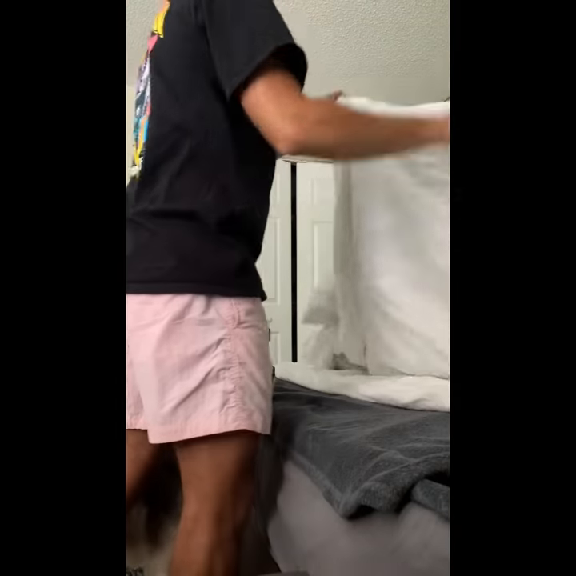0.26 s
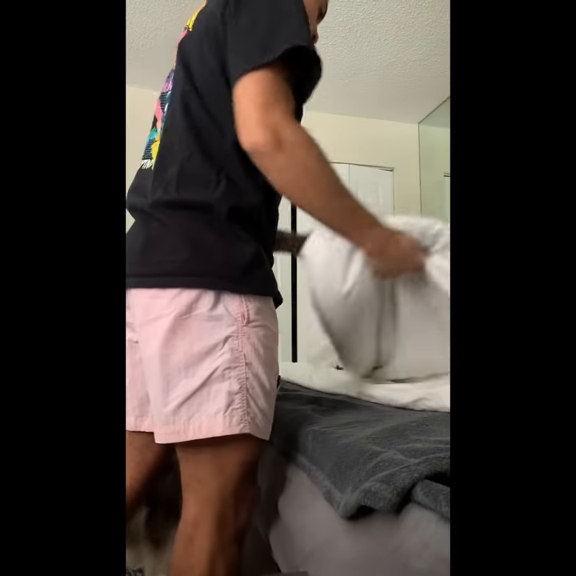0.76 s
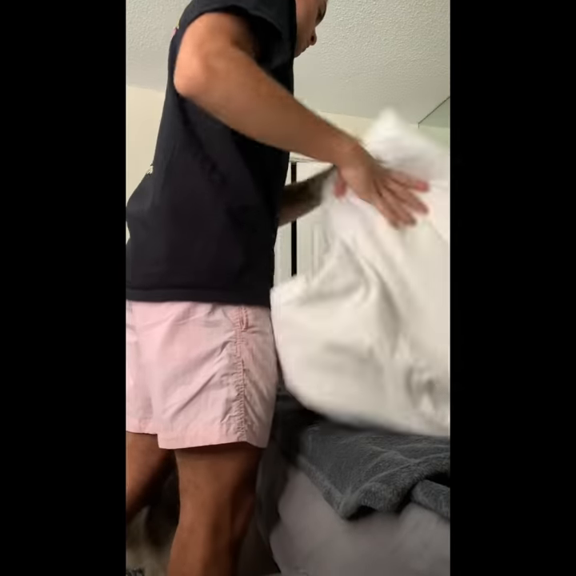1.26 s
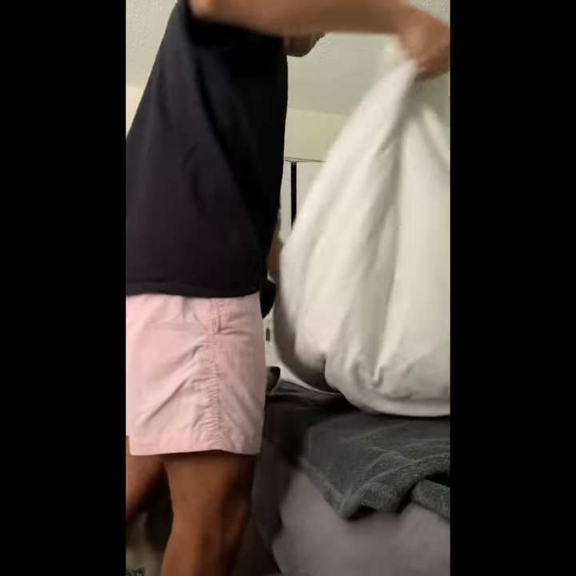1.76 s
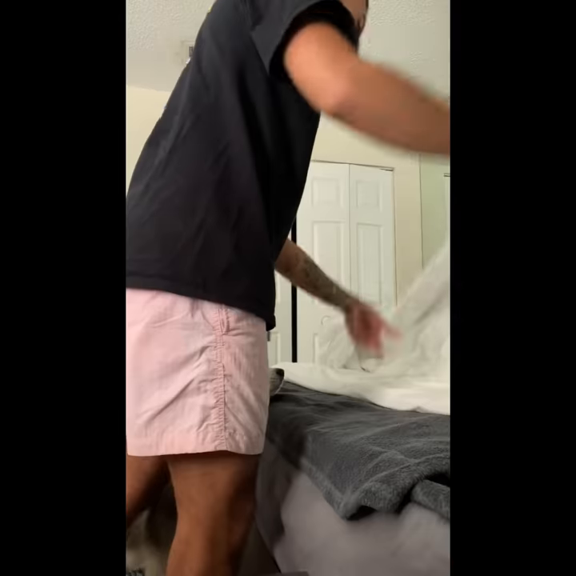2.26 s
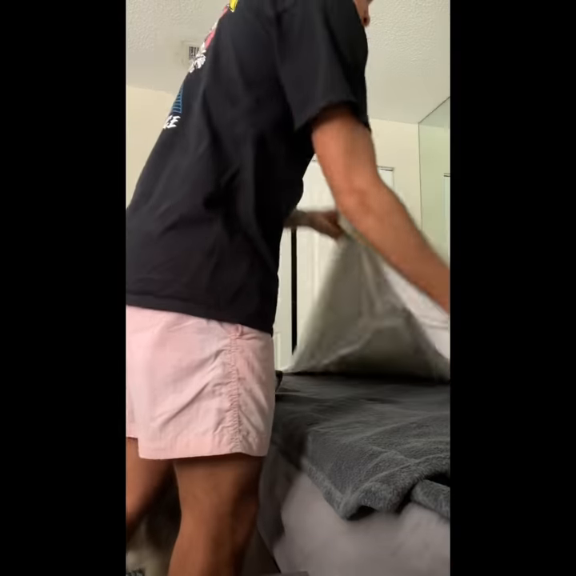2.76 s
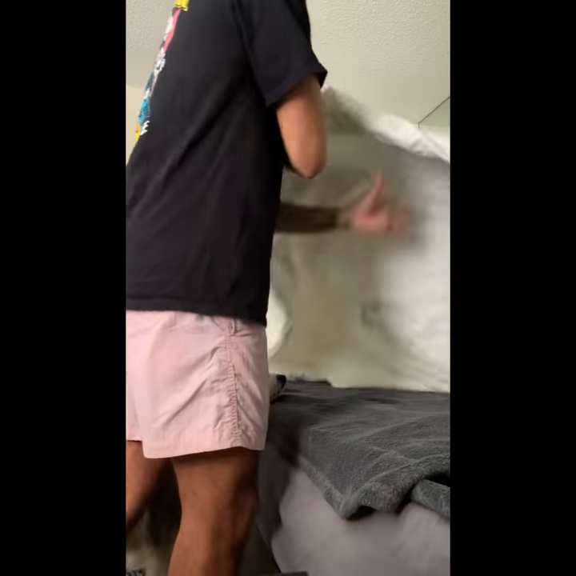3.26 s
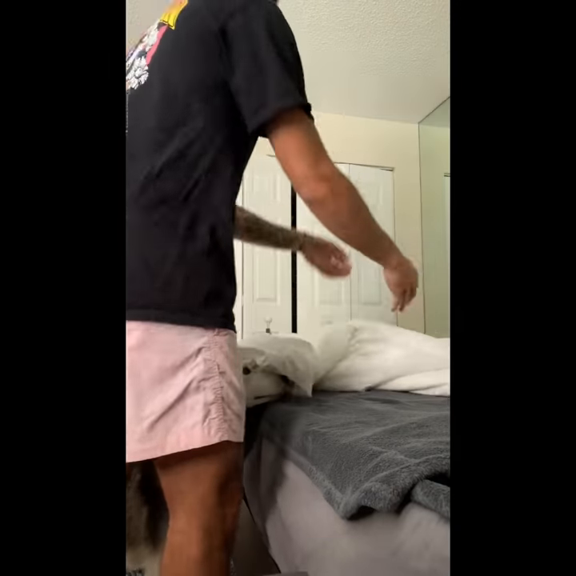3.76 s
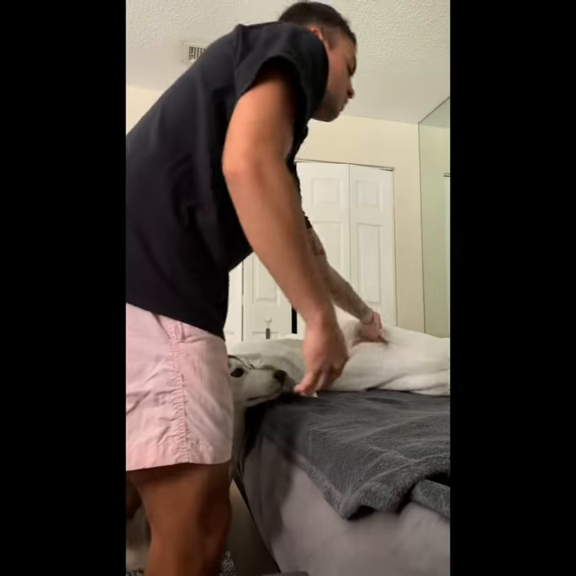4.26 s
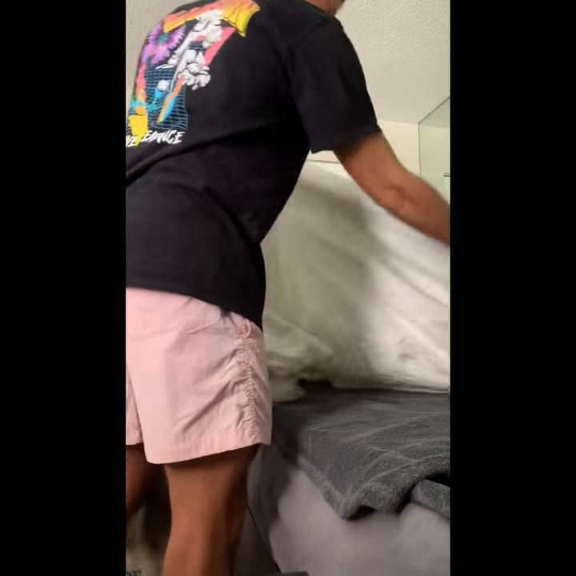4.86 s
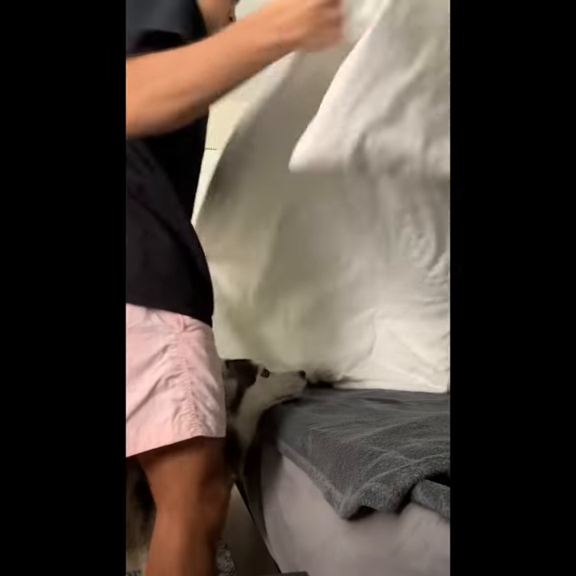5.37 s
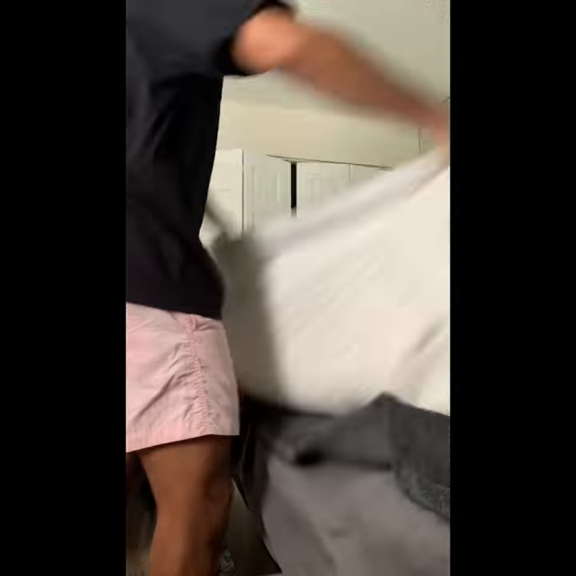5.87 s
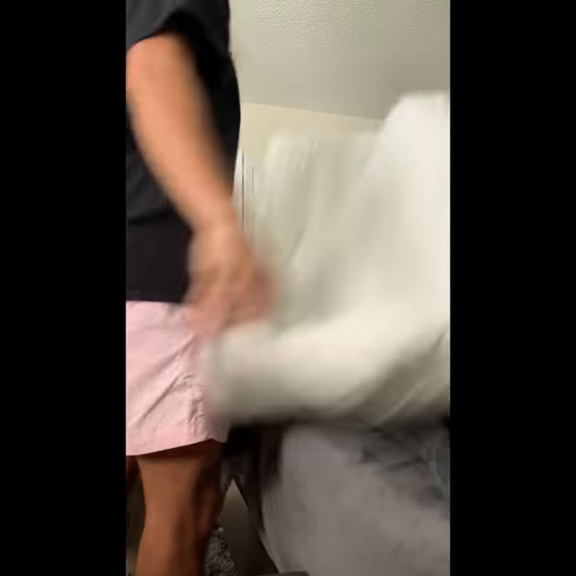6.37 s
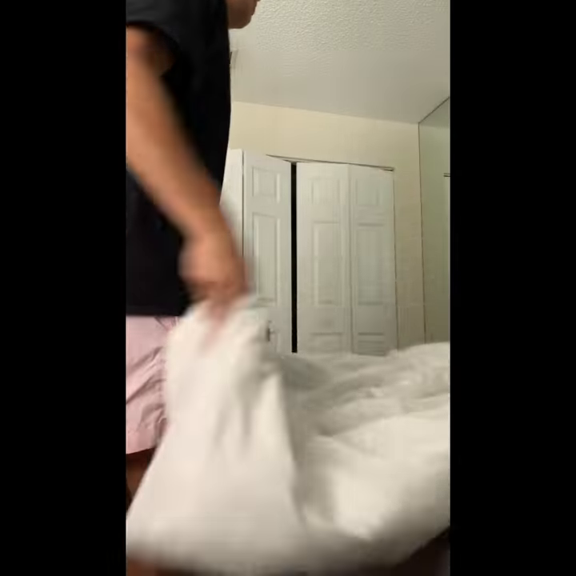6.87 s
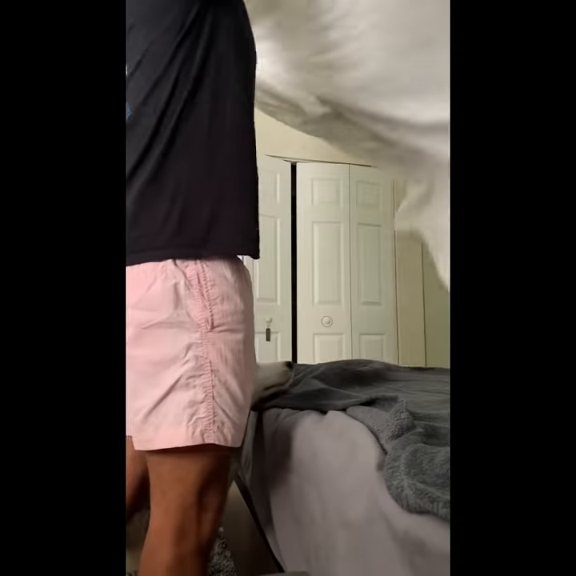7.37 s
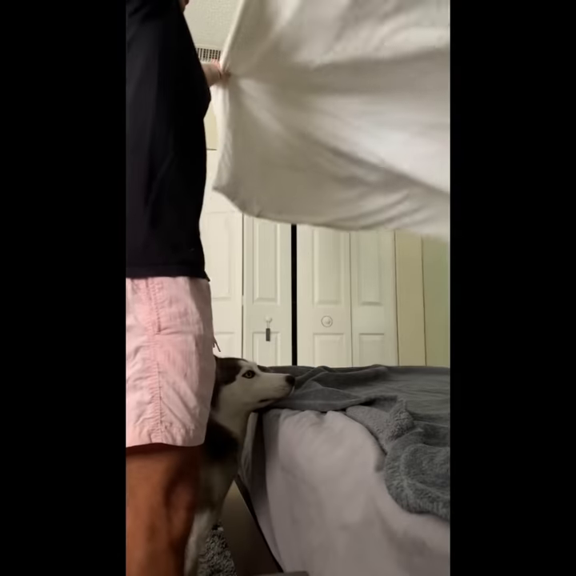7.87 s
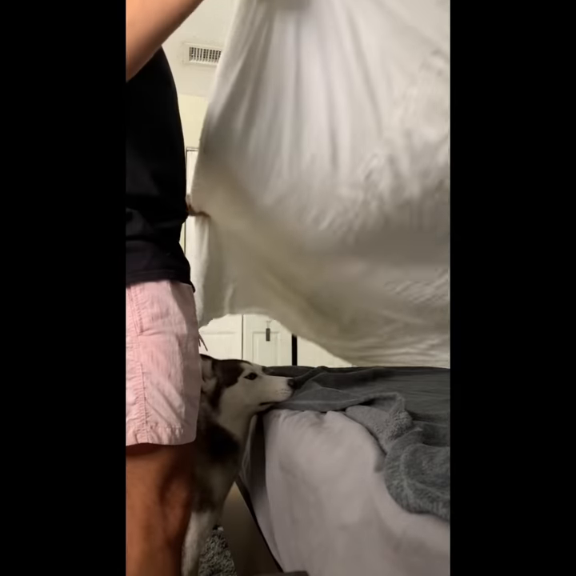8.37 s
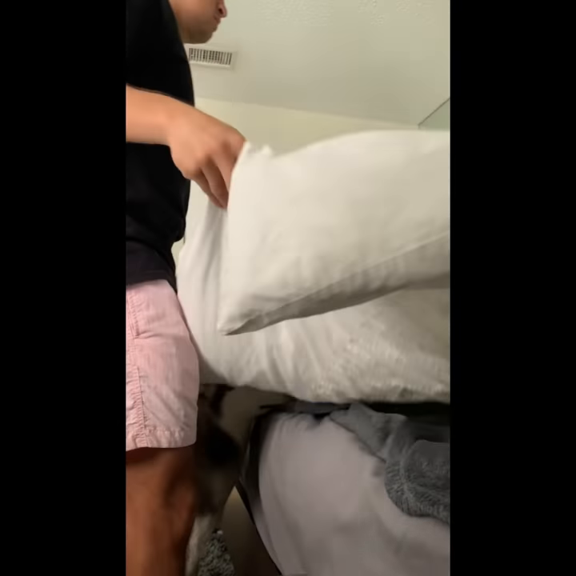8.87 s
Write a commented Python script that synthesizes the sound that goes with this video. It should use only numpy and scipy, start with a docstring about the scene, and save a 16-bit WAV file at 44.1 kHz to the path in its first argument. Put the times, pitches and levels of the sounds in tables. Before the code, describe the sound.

Soft cloth rustling and light pats build to a burst of heavy, padded flapping and airy thumps, then settle into dull puffs of air.

```python
"""A small bedroom: pillows are lifted, shaken out and dropped on a bed, an arm's length from a phone.
Slack cotton folds, rubs and hisses: noise and random slips, coloured and swelled with each move.
Taut panels flap as short noise bursts; the soft filling puffs air as brief low pressure swings.
Under it a household motor hums and an engine drones faintly outside, both as sine tones."""
import sys
import numpy as np
from scipy import signal
from scipy.fft import rfft, irfft, next_fast_len
from scipy.io import wavfile

SR = 44100
rng = np.random.default_rng(int(sys.argv[2]) if len(sys.argv) > 2 else 0)


def unload_audio(sound):
    """Save the sound as a 16-bit wav file, at the path given as the first command line argument."""
    columns = np.transpose(np.atleast_2d(sound))
    # keep every value between -1 and 1, then stretch to whole-number steps
    steps = np.round(np.clip(columns, -1, 1) * 32767)
    wavfile.write(sys.argv[1], SR, steps.astype(np.int16))


N = 402191
TIME = np.arange(N) / SR  # s


def undb(db):
    """Decibels to gain."""
    return 10 ** (np.asarray(db) / 20)


def unit(x):
    """Scale to rms 1."""
    return x / np.sqrt(np.mean(x ** 2))


def curves(rows):
    """Each column of a table, joined by straight lines in time."""
    s, *columns = np.transpose(rows)
    return [np.interp(TIME, s, column) for column in columns]


def colour(x, points):
    """Filter by a spectrum of (f/Hz, gain/dB) points, joined on a log frequency axis."""
    hz, db = np.transpose(points)
    size = next_fast_len(len(x))
    f_hz = np.maximum(np.fft.rfftfreq(size, 1 / SR), 1)
    gain = undb(np.interp(np.log(f_hz), np.log(hz), db))
    return irfft(rfft(x, size) * gain, size)[:len(x)]


def band(x, lo_hz, hi_hz):
    """Causal band-pass, 18 dB an octave on both sides."""
    sos = signal.butter(3, [lo_hz, hi_hz], "band", fs=SR, output="sos")
    return signal.sosfilt(sos, x)


def walk(rate_hz):
    """Slow chance with a spread near 1: random points joined by straight lines."""
    points = np.clip(rng.standard_normal(4096), -1.8, 1.8)
    return np.interp(TIME * rate_hz, np.arange(len(points)), points)


def add(track, s, sound):
    """Mix a sound in at a time."""
    i = max(int(s * SR), 0)
    track[i:i + len(sound)] += sound[:max(N - i, 0)]


MOVE_SHAPE = 1.42  # 1: pointed crest, 2: round crest


def swells(moves):
    """Each move gathers strength up to its crest and dies away; overlapping moves add in power."""
    t = TIME[::64]
    power = 1e-11  # floor
    for s, rise_s, fall_s, db in moves:
        before = (s - t) / max(rise_s, .01)
        after = (t - s) / max(fall_s, .01)
        away = np.where(t < s, before, after)
        power = power + (undb(db) * np.exp(-away ** MOVE_SHAPE)) ** 2
    return np.interp(TIME, t, np.sqrt(power))


# port unlikeness: f/Hz, side minus mid level/dB
PORT_WIDTH = [(150, -18), (350, -1), (1300, 3.5), (6000, -6)]


def two_ports(size):
    """Diffuse sound at two close ports: alike in the bass, less alike higher up."""
    mid, side = rng.standard_normal((2, size))
    side = colour(side, PORT_WIDTH)
    return np.array([mid + side, mid - side])


def bedroom(x, wet_db, t60_s):
    """The direct sound reaches both ports; near walls add a short, dense tail."""
    t = TIME[:SR // 2]
    onset = np.clip((t - .002) / 0.0031, 0, 1)
    tail = two_ports(len(t)) * undb(-60 * t / t60_s) * onset
    tail *= undb(wet_db) / np.sqrt(np.sum(tail.mean(axis=0) ** 2))
    wet = signal.fftconvolve(x[None], tail, axes=1)[:, :N]
    return (x + wet) / np.sqrt(1 + undb(2 * wet_db))  # keeps the power about even


# still-air spectrum: f/Hz, relative level/dB
STILL_SPECTRUM = [(20, -20), (45, -2), (100, -1.5), (200, -11), (450, -23), (900, -28), (1700, -31),
                  (3300, -32.5), (6500, -37), (16000, -39)]
STILL_RMS_DB = -57.7  # mean of a slow wander


def still_air():
    """Diffuse room noise, duller with frequency, its level wandering slowly."""
    noise = unit(np.array([colour(port, STILL_SPECTRUM) for port in two_ports(N)]))
    return noise * undb(STILL_RMS_DB + 0.5 * walk(rate_hz=2.0))


# engine pulling away and changing up: t/s, firing rate f/Hz, rms level/dB
ENGINE_TRACK = [(2.3, 42, -74), (3.5, 42, -61), (4.2, 38, -59), (4.6, 44, -50), (5, 49, -46),
                (5.7, 55, -41.5), (6.4, 65, -40.5), (7.3, 56, -48.5), (8.3, 57.5, -42.5), (9.12, 58, -85)]


def engine():
    """A sine at the firing rate, gliding with engine speed."""
    hz, db = curves(ENGINE_TRACK)
    phase = 2 * np.pi * np.cumsum(hz) / SR
    return np.sqrt(2) * undb(db) * np.sin(phase)


# motor hum: t/s, rms level/dB (mean of a slow wander)
HUM_TRACK = [(0, -49.5), (.4, -55), (1.5, -53.5), (2.6, -49.5), (4, -45.5), (5.5, -43), (7, -89),
             (7.7, -92), (9.12, -42.5)]
MOTOR_HZ, MAINS_BUZZ_HZ = 59.4, 120


def motor():
    """The motor's hum and its mains buzz: two sines of wandering level."""
    hum_db, = curves(HUM_TRACK)
    hum = undb(hum_db + 1.15 * walk(rate_hz=3.67)) * np.sin(2 * np.pi * MOTOR_HZ * TIME)
    buzz = undb(-60.0 + 0.75 * walk(rate_hz=3.1)) * np.sin(2 * np.pi * MAINS_BUZZ_HZ * TIME)
    return np.sqrt(2) * (hum + buzz)


def background():
    """Still room air, the motor and the engine."""
    return still_air() + motor() + engine()


# stirred-air spectrum: f/Hz, relative level/dB
AIR_SPECTRUM = [(20, -33), (35, -6), (50, 2.5), (70, -0.5), (92, 0.5), (125, -2.5), (170, -9.5),
                (300, -24.5), (800, -67)]


def stirred_air(air):
    """Eddies shed by the swinging pillow: low noise that follows the air's strength."""
    return air * unit(colour(rng.standard_normal(N), AIR_SPECTRUM))


# a loose sheet fills with air: crest t/s, rise/s, fall/s, level/dB
SHEET_BILLOWS = [(1.3, 0.091, 0.05, -50), (1.77, 0.041, 0.022, -49), (2.45, 0.075, 0.07, -43),
                 (3.2, 0.27, 0.34, -46.5), (4.63, 0.02, 0.039, -38), (5.25, 1, 0.2, -54),
                 (7.26, 0.068, 0.021, -40), (7.54, 0.038, 0.023, -39.5), (8.0, 0.022, 0.017, -43),
                 (8.2, 0.096, 0.04, -45), (8.72, 0.28, 0.036, -51)]
# billow spectrum: f/Hz, relative level/dB
BILLOW_SPECTRUM = [(50, 4), (110, 1), (170, -3.5), (270, -2), (400, -10.5), (700, -33.5), (1500, -68)]


def billows():
    """Broad, slack cloth pushes the air without creasing: smooth, dull swells of noise."""
    return swells(SHEET_BILLOWS) * unit(colour(rng.standard_normal(N), BILLOW_SPECTRUM))


# puffs of air from the filling: crest t/s, dry peak level/dB, f/Hz
FILLING_PUFFS = [(0.551, -27.5, 103), (1.223, -26.5, 110), (3.013, -24.5, 84.5), (6.032, -12, 107),
                 (6.411, -18.5, 97), (6.578, -6, 94.5), (7.041, -17, 88), (7.084, -22, 66),
                 (8.532, -25, 60), (8.616, -23.5, 60.3), (8.73, -14, 45.4), (8.758, -14.5, 73.4),
                 (9.051, -25, 60.6)]


def thumps():
    """The filling is squeezed and springs back: one smooth swing of pressure."""
    out, half = np.zeros(N), SR // 10
    t = np.arange(-half, half) / SR
    for s, db, hz in FILLING_PUFFS:
        swing = np.cos(2 * np.pi * hz * t) * np.exp(-(t * hz / 0.61) ** 2)
        add(out, s - half / SR, undb(db) * swing)
    return out


# cloth pulled taut or patted: t/s, dry peak level/dB, body f/Hz, brightness f/Hz, decay/s
TAUT_FLAPS = [(.497, -41.5, 278, 1860, 0.02), (1.214, -23, 396, 2460, 0.006), (1.218, -27, 150, 453, 0.013),
              (2.841, -31.5, 250, 950, 0.0061), (2.964, -42, 300, 1580, 0.005),
              (2.993, -40, 376, 2190, 0.0092), (3.262, -40, 230, 900, 0.028),
              (3.448, -39.5, 230, 870, 0.02), (3.681, -42.5, 250, 1180, 0.0034),
              (4.626, -38, 170, 1000, 0.0095), (4.81, -40.5, 190, 560, .012),
              (4.885, -38, 140, 910, 0.0098), (5.766, -32, 275, 930, 0.01), (5.812, -19, 403, 870, 0.0055),
              (6.178, -17.5, 218, 470, 0.02), (6.197, -12, 226, 546, 0.014),
              (6.201, -18.5, 590, 2230, 0.01), (6.338, -27.5, 890, 2100, 0.022),
              (6.405, -23.5, 160, 614, 0.018), (6.563, -18, 200, 970, 0.0098),
              (6.932, -30, 250, 1220, 0.078), (7.006, -23.5, 298, 1520, 0.005),
              (7.352, -24, 133, 267, 0.0065), (8.829, -42, 130, 440, 0.0041), (8.852, -37, 140, 450, 0.004)]
RISE_PER_DECAY, TUG = .12, 11  # TUG: first sample, in noise rms


def flaps():
    """A panel snaps taut: a sharp tug, then a noise burst; deeper if large, duller where padded."""
    out, t = np.zeros(N), TIME[:SR // 4]
    for s, db, body_hz, bright_hz, decay_s in TAUT_FLAPS:
        age = t / decay_s
        envelope = (1 - np.exp(-age / RISE_PER_DECAY)) * np.exp(-age)
        burst = TUG * (t == 0) + rng.standard_normal(len(t)) * envelope
        snap = band(burst, lo_hz=body_hz, hi_hz=bright_hz)
        add(out, s, snap * undb(db) / np.abs(snap).max())
    return out


# pillow gripped, swung or set down, slack cloth folds: crest t/s, rise/s, fall/s, relative level/dB
PILLOW_SWINGS = [(.03, 0.27, 0.052, -52), (.54, 0.04, 0.041, -43.5), (.76, 0.25, 0.036, -59),
                 (1.11, 0.068, 0.099, -53.5), (1.27, 0.065, 0.073, -45.5), (1.52, 0.48, 0.03, -60),
                 (1.91, 0.095, 0.093, -50), (2.34, .02, 0.11, -54.5), (2.48, 0.14, 0.045, -54),
                 (2.68, 0.16, 0.25, -49), (2.86, 0.026, 0.022, -46), (3.0, 0.082, 0.07, -44.5),
                 (3.31, 0.14, 0.11, -50.5), (3.44, 0.18, 0.064, -50), (3.57, 0.041, 0.057, -49.5),
                 (3.71, 0.053, 0.025, -50), (4.4, 0.041, .072, -59), (4.63, 0.047, 0.059, -51),
                 (4.9, 0.066, 0.026, -48), (5.04, 0.073, 0.11, -50.5), (5.25, 0.092, 0.11, -52),
                 (5.45, 0.04, 0.053, -52), (5.6, 0.12, 0.083, -54.5), (5.84, 0.07, 0.15, -35.5),
                 (6.02, 0.067, 0.067, -29), (6.225, 0.046, 0.08, -27), (6.46, 0.087, 0.085, -29),
                 (6.56, 0.075, 0.06, -31.5), (6.68, 0.065, 0.1, -36.5), (7.03, 0.076, 0.23, -33.5),
                 (7.14, 0.069, 0.05, -40), (7.56, 0.084, 0.15, -61), (8.02, 0.14, 0.056, -51.5),
                 (8.43, 0.048, 0.053, -61.5)]
# cloth slides over cloth or skin:
# crest t/s, rise/s, fall/s, relative rub level/dB, hiss minus rub level/dB
CLOTH_SLIDES = [(0., .05, 0.16, -62.5, -16), (.53, 0.039, 0.16, -64.5, -14.5),
                (.85, 0.078, 0.91, -69.5, -31), (1.26, 0.094, 0.066, -55.5, -7.5),
                (1.56, 0.15, 0.12, -62.5, -9), (1.94, .1, .17, -60, -14), (2.42, 0.082, 0.22, -69, -30),
                (2.73, 0.16, 0.086, -59.5, -10), (3.04, 0.2, 0.24, -60, -19), (3.36, .08, .06, -62.5, -8.5),
                (3.57, .07, .09, -62, -14), (3.72, .05, .06, -63, -15), (4.68, .13, .2, -60.5, -12),
                (4.92, 0.33, 0.25, -67.5, -9), (5.24, 0.14, 0.14, -64.5, -8), (5.6, 0.042, 0.45, -69, -21),
                (6.01, 0.088, 0.044, -46.5, -11.5), (6.209, 0.02, 0.015, -41.5, -21),
                (6.42, 0.69, 0.05, -52, -14.5), (6.56, 0.13, 0.14, -58, -16),
                (6.959, 0.081, 0.052, -51, -13), (7.099, 0.068, 0.078, -43.5, -10),
                (7.3, 0.23, 0.13, -72, -3.5), (7.601, 0.21, 0.095, -64.5, -34),
                (8.06, 0.12, 0.12, -59, -24), (8.45, 0.16, 0.21, -73, -26), (8.82, 0.06, 0.22, -61, -17),
                (9.11, 0.04, .036, -60.5, -17)]
# draught of a lowered pillow at the microphone: crest t/s, rise/s, fall/s, level/dB
PILLOW_DRAUGHTS = [(2.44, 0.032, 0.046, -34.5), (8.19, 0.042, 0.089, -46.5), (8.6, 0.086, 0.024, -35),
                   (8.74, 0.062, 0.045, -27), (9.05, 0.05, 0.0091, -35.5)]
SWING_RUB_DB, CREASE_HISS_DB = -22, -17.5  # creases re folds; thread hiss re creases
SWING_AIR_DB, AIR_GROWTH = 2, 0.83  # air re folds at the hardest swing; dB of air per dB of swing


def handling():
    """Strengths of fold, rub, hiss and air: swings fold the cloth and fan air, slides rub and hiss."""
    swing = swells(PILLOW_SWINGS)
    sliding_rub = swells([row[:-1] for row in CLOTH_SLIDES])
    rub = np.hypot(swing * undb(SWING_RUB_DB), sliding_rub)
    sliding_hiss = swells([(s, rise_s, fall_s, db + hiss_db)
                           for s, rise_s, fall_s, db, hiss_db in CLOTH_SLIDES])
    hiss = np.hypot(sliding_hiss, rub * undb(CREASE_HISS_DB))
    fanned = swing.max() * undb(SWING_AIR_DB) * (swing / swing.max()) ** AIR_GROWTH
    air = np.hypot(fanned, swells(PILLOW_DRAUGHTS))
    return swing, rub, hiss, air


def slips(per_second, scatter_db, smooth):
    """Random tiny releases of uneven size, over a smooth share of noise for countless smaller ones."""
    chance = rng.random(N)
    size, sign, rest = rng.standard_normal((3, N))
    heights = np.sign(sign) * undb(scatter_db * np.clip(size, -2, 2))
    clicks = (chance < per_second / SR) * heights
    return unit(unit(clicks / np.sqrt(per_second)) + smooth * rest)


def shifting(x, depth_db, rate_hz, count=14):
    """The folds keep changing shape, so each half octave swells and fades on its own."""
    size = next_fast_len(N)
    f_hz = np.maximum(np.fft.rfftfreq(size, 1 / SR), 1)
    place = np.clip(2 * np.log2(f_hz / 170), 0, count - 1)  # in half octaves
    spectrum, total = rfft(x, size), np.zeros(N)
    for k in range(count):
        part = irfft(spectrum * np.maximum(1 - np.abs(place - k), 0), size)[:N]
        total += part * undb(depth_db * walk(rate_hz))
    return unit(total)


# fold, crease-rub and thread-hiss spectra, each: f/Hz, relative level/dB
FOLD_SPECTRUM = [(60, -19), (130, -2.5), (200, 1.5), (270, 0), (350, -5), (450, -6.5), (600, -15.5),
                 (820, -13.5), (1100, -30.5), (2000, -49.5), (5000, -124)]
RUB_SPECTRUM = [(400, 0), (900, 7), (1400, 4), (1750, 5.5), (2250, -5), (2850, 0.5), (3200, -9.5),
                (3650, -7), (5000, -17.5), (7000, -10), (15000, -110)]
HISS_SPECTRUM = [(1200, -13), (2300, -3), (3600, 5.5), (4600, 1.5), (6000, -1.5), (9000, -8.5),
                 (11000, -4.5), (16000, -6)]
POPS_PER_S, BUCKLE_GROWTH = 380, .25
CRACK_DB = -15  # bright crack of a buckling fold re its body
JERK_DB, CATCH_DB = 2.6, 1.0  # level jerks: folds at their slowest; creases and threads
CREASE_SHIFT_DB, THREAD_SHIFT_DB = 3.6, 3.4  # wander of colour


def cloth(fold, rub, hiss):
    """Gentle folds roll smoothly, hard ones buckle in pops; creases catch and slip, threads hiss."""
    speed = (rub / rub.max()) ** .4
    catch = walk(rate_hz=41)  # small jerks, strongest in slow folds
    buckle = .9 * (fold / fold.max()) ** BUCKLE_GROWTH
    rolling = np.sqrt(1 - buckle ** 2) * rng.standard_normal(N)
    pops = buckle * slips(POPS_PER_S, scatter_db=3, smooth=0) + rolling
    body = unit(colour(pops, FOLD_SPECTRUM))
    crack = undb(CRACK_DB) * unit(colour(pops, RUB_SPECTRUM))
    folds = (body + crack) * fold * undb(JERK_DB * (1 - buckle ** 2) * catch)

    crease_slips = colour(slips(2500 * speed, scatter_db=0.0, smooth=0.89), RUB_SPECTRUM)
    creases = shifting(crease_slips, CREASE_SHIFT_DB, rate_hz=32) * rub * undb(CATCH_DB * catch)
    thread_slips = colour(slips(9000 * speed, scatter_db=1.0, smooth=0.81), HISS_SPECTRUM)
    threads = shifting(thread_slips, THREAD_SHIFT_DB, rate_hz=57) * hiss * undb(CATCH_DB * catch)
    return undb(2.5) * folds + undb(3.0) * creases, undb(14.0) * threads


def scene():
    """Cloth and air in the room, over the background; small eddies strike the ports in antiphase."""
    fold, rub, hiss, air = handling()
    crumple, threads = cloth(fold, rub, hiss)
    puffs = bedroom(thumps() + stirred_air(air), wet_db=-9.0, t60_s=0.82)
    eddies = undb(-17) * stirred_air(air) * np.array([[1], [-1]])
    snaps = bedroom(flaps(), wet_db=-8.5, t60_s=0.21)
    rustle = bedroom(crumple + billows(), wet_db=-7.5, t60_s=0.35)
    sheen = bedroom(threads, wet_db=-6, t60_s=.2)
    return background() + puffs + eddies + snaps + rustle + sheen


WIDEN_FROM_HZ, WIDEN_LAG_S = 2750, .000243


def widen(stereo):
    """The treble of the right channel lags the left; bass and middle stay in step."""
    size = next_fast_len(N + SR // 10)
    above_hz = np.maximum(np.fft.rfftfreq(size, 1 / SR) - WIDEN_FROM_HZ, 0)
    lag = np.exp(-2j * np.pi * above_hz * WIDEN_LAG_S)
    right = irfft(rfft(stereo[1], size) * lag, size)[:N]
    return np.array([stereo[0], right])


TOP_HZ = 15900


def record(dry):
    """The phone widens the treble, thins the deepest bass and cuts the top."""
    high_pass = signal.butter(6, 33, "high", fs=SR, output="sos")
    low_pass = signal.ellip(10, .2, 80, TOP_HZ, fs=SR, output="sos")
    thin = signal.sosfilt(high_pass, widen(dry))
    return signal.sosfilt(low_pass, thin)


dry = scene()
out = record(dry)
unload_audio(out)
```